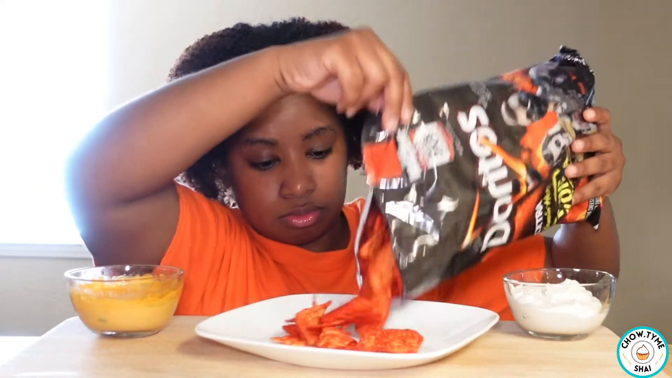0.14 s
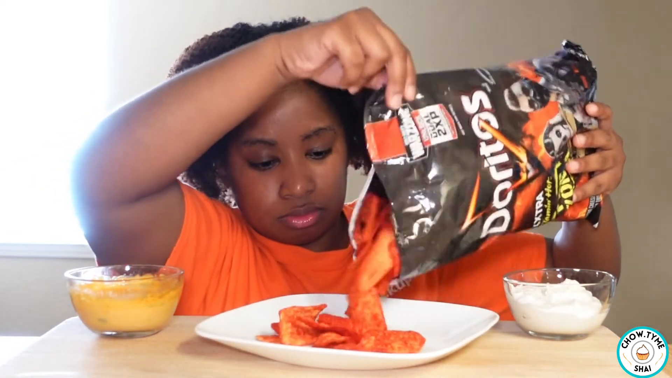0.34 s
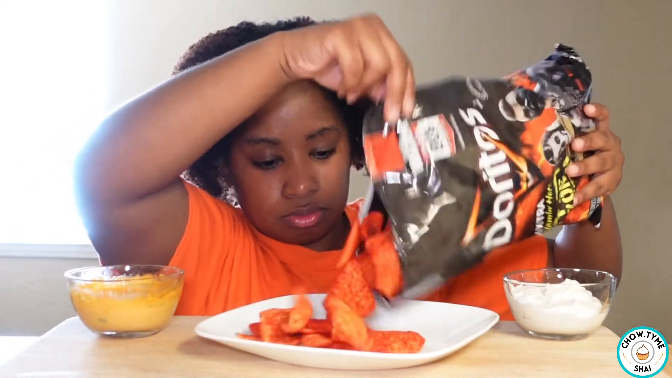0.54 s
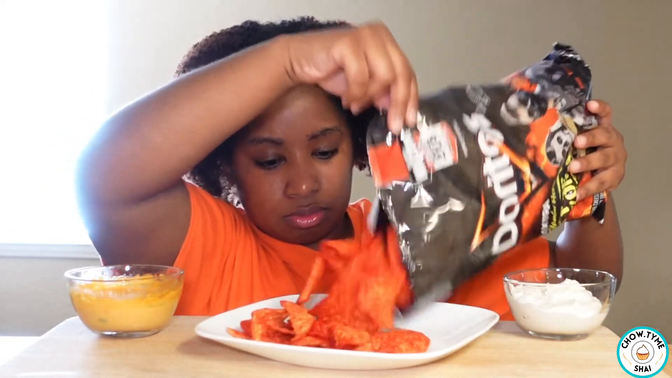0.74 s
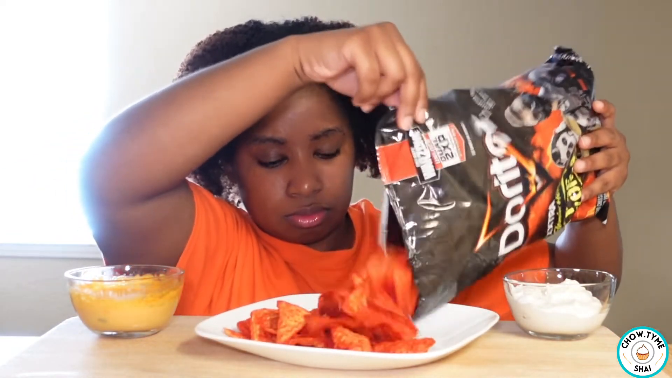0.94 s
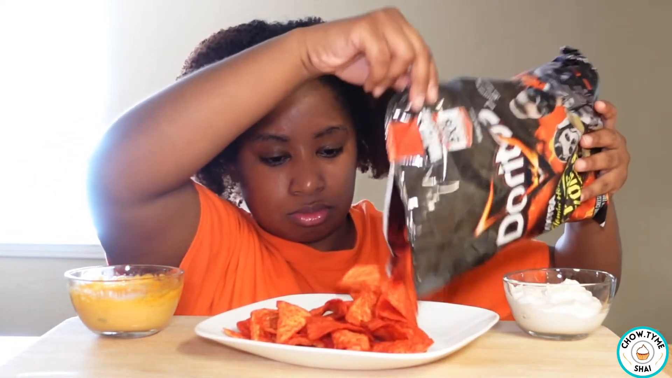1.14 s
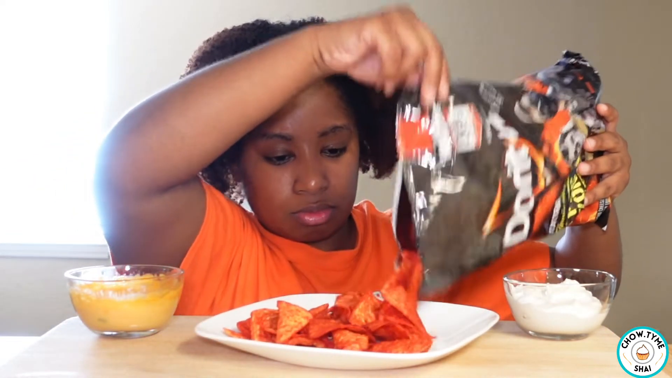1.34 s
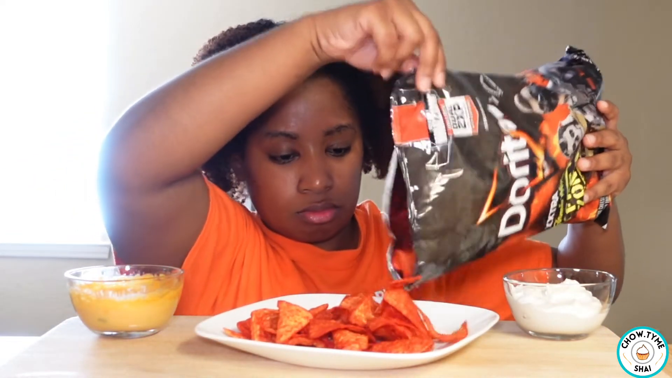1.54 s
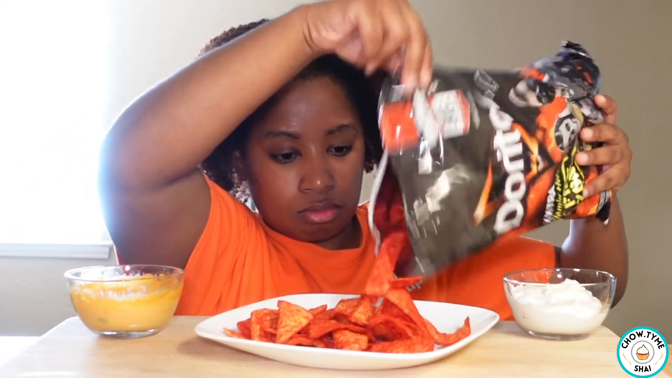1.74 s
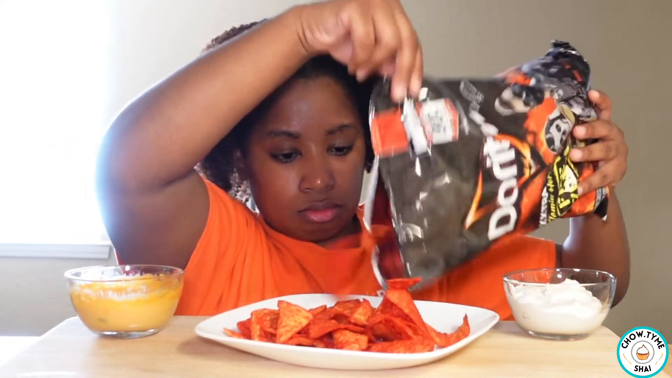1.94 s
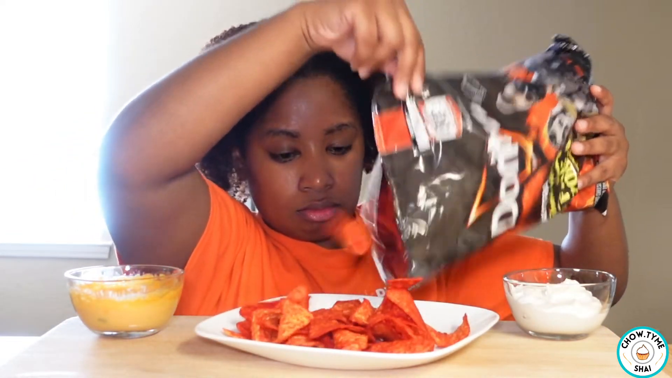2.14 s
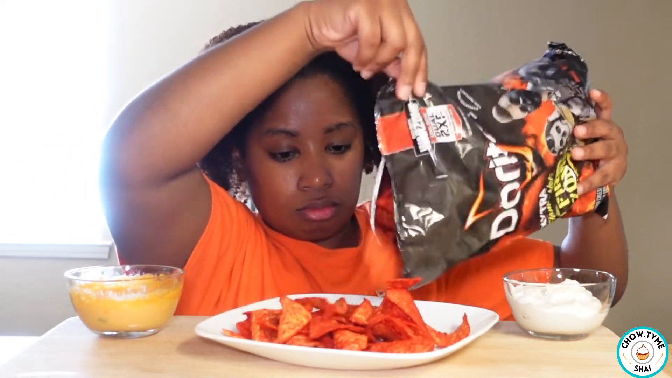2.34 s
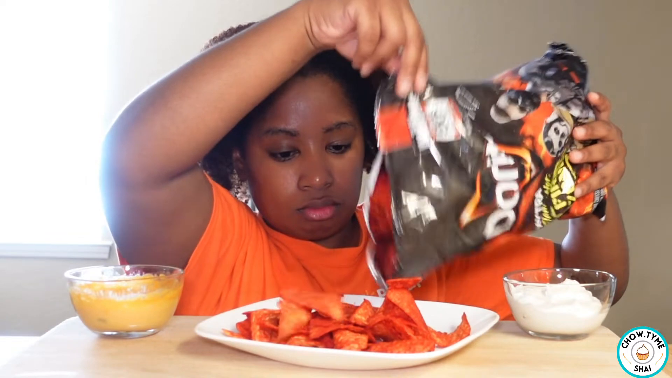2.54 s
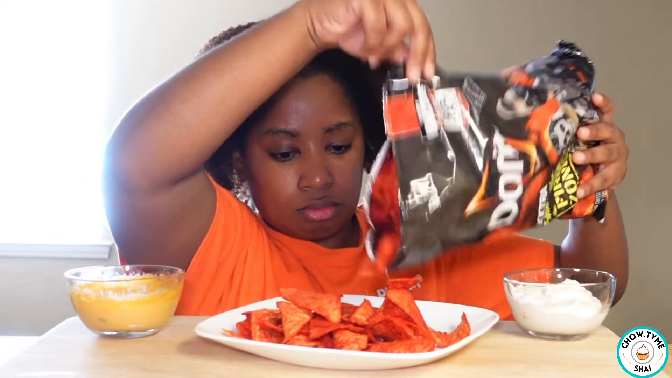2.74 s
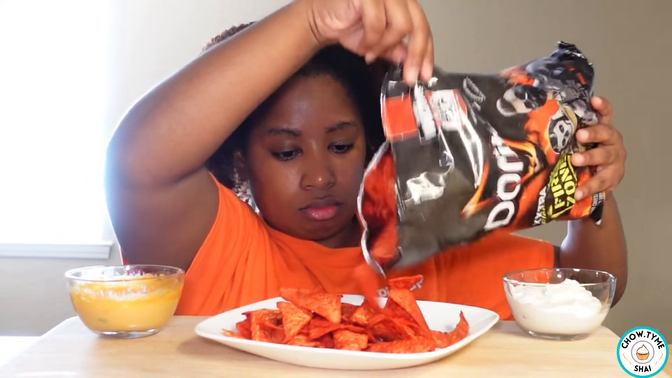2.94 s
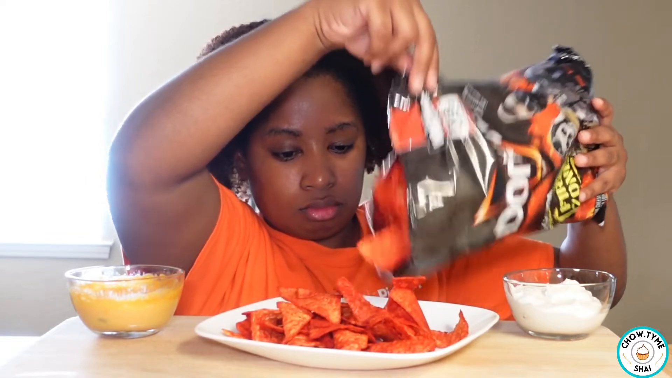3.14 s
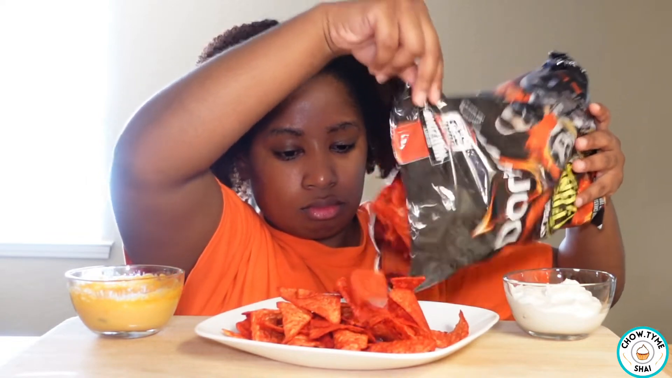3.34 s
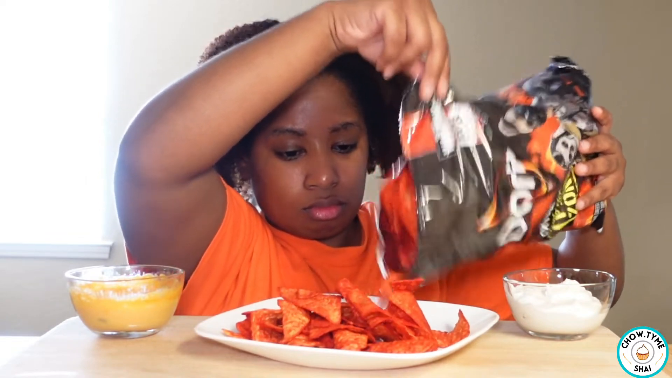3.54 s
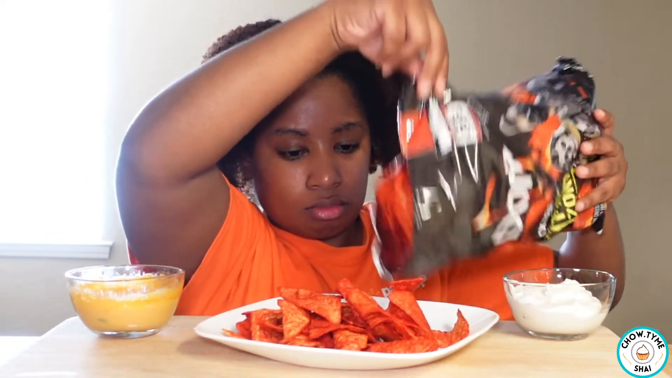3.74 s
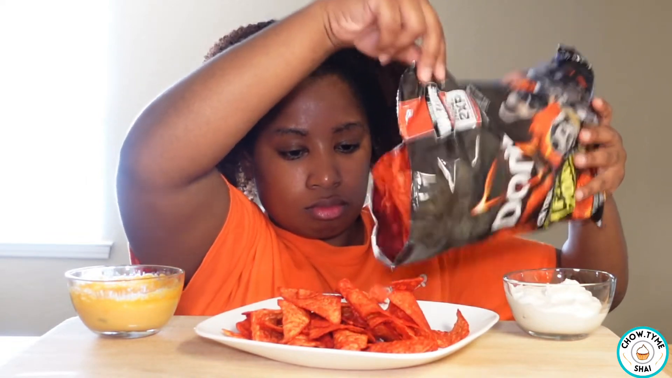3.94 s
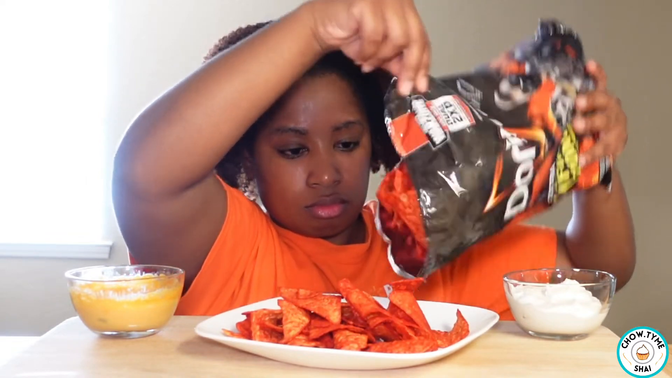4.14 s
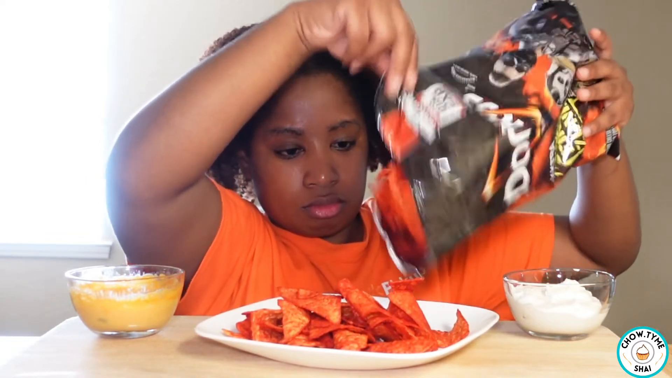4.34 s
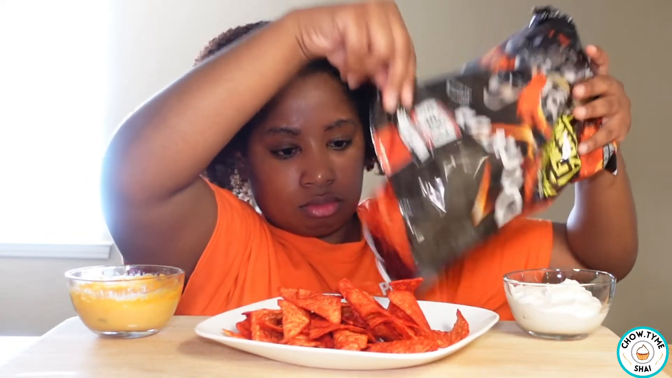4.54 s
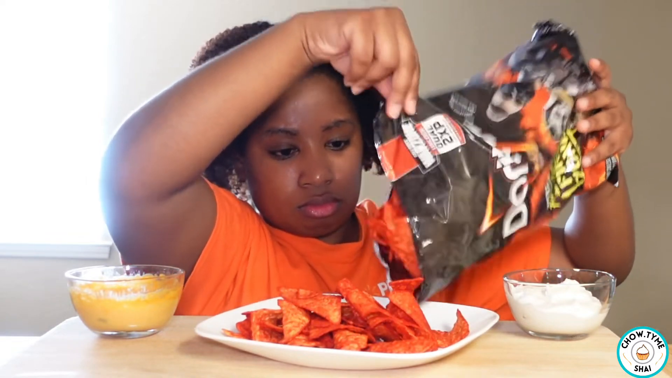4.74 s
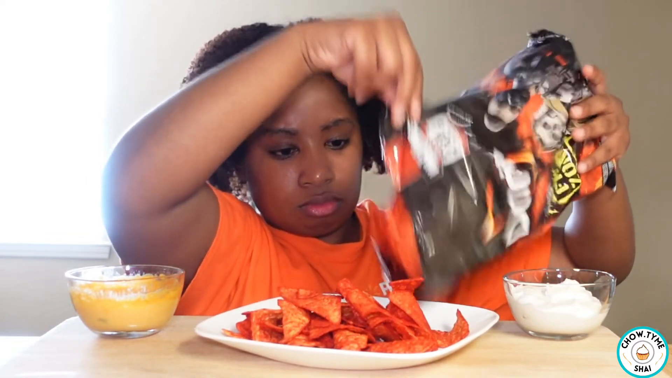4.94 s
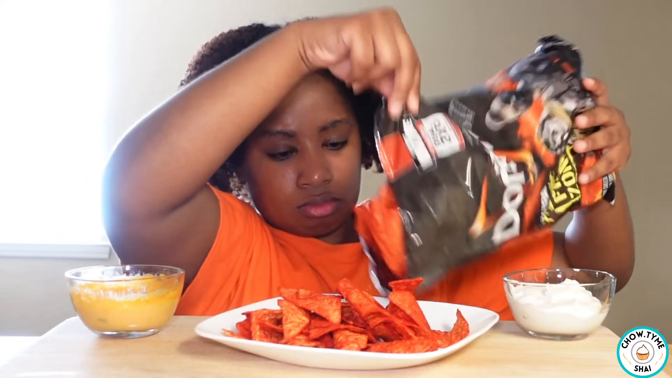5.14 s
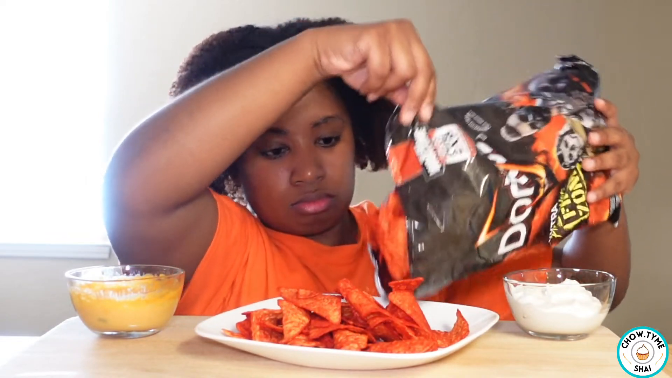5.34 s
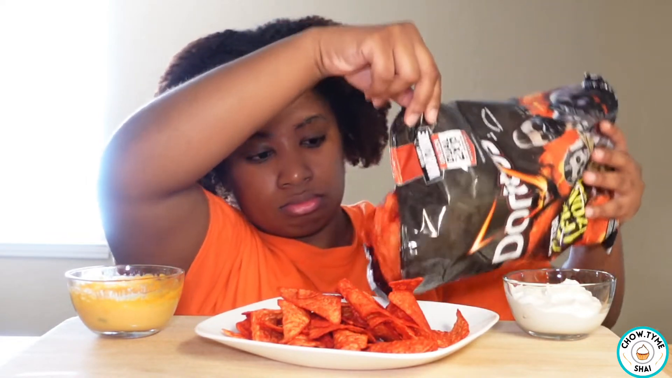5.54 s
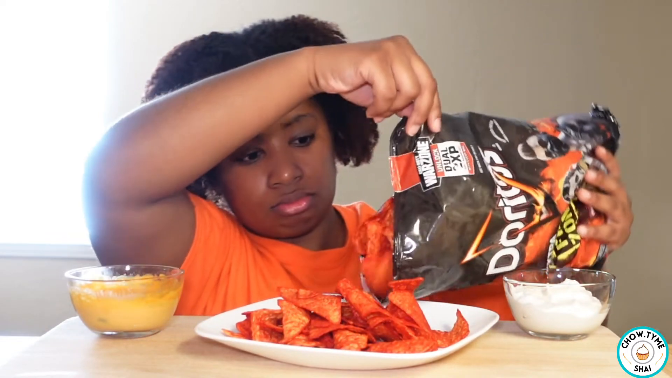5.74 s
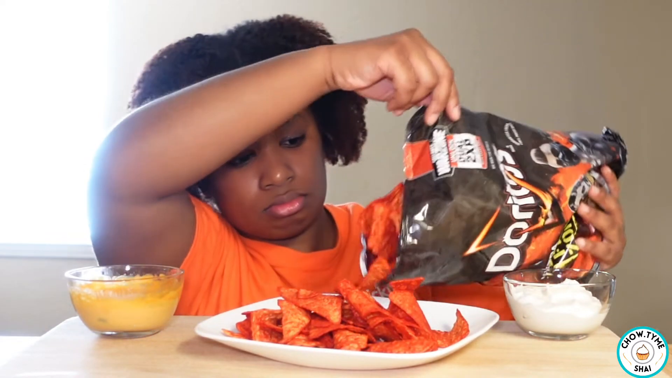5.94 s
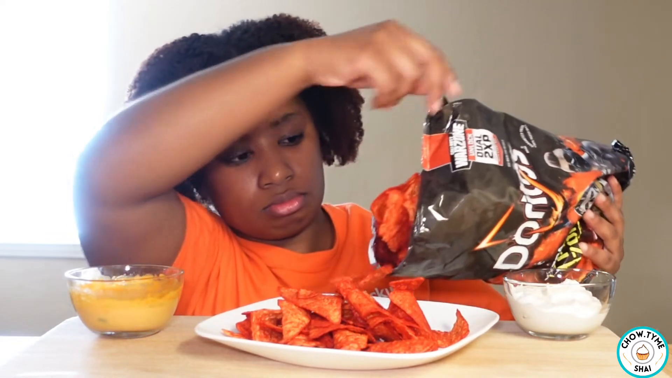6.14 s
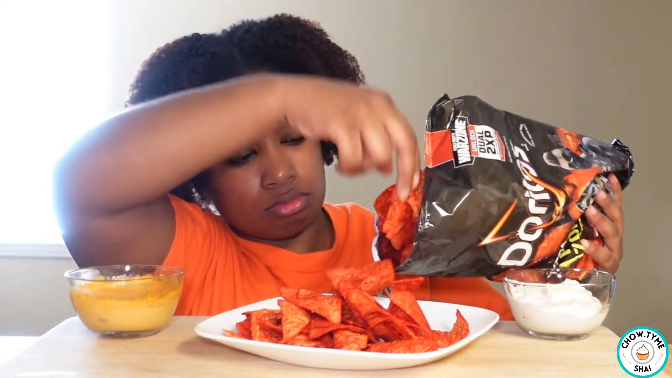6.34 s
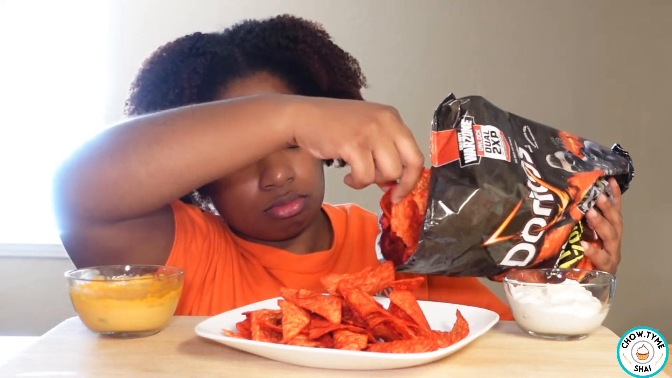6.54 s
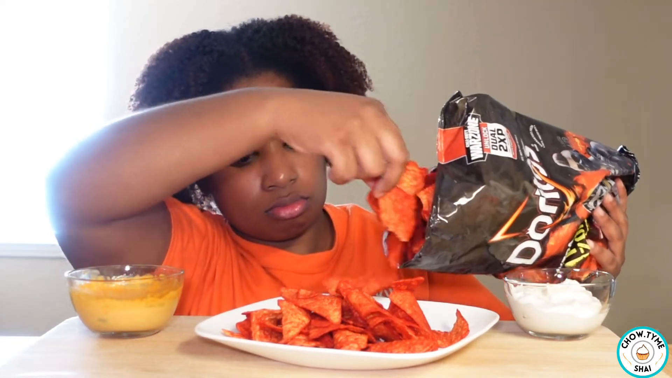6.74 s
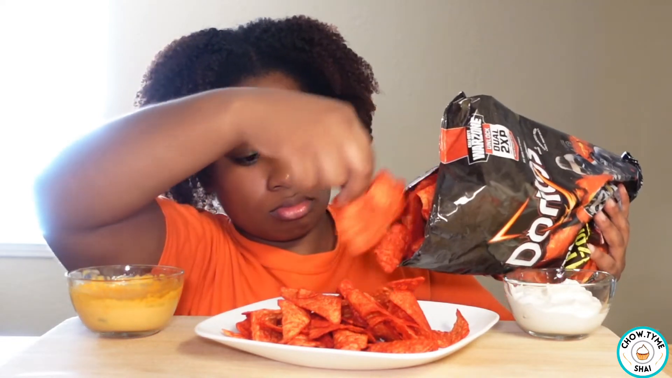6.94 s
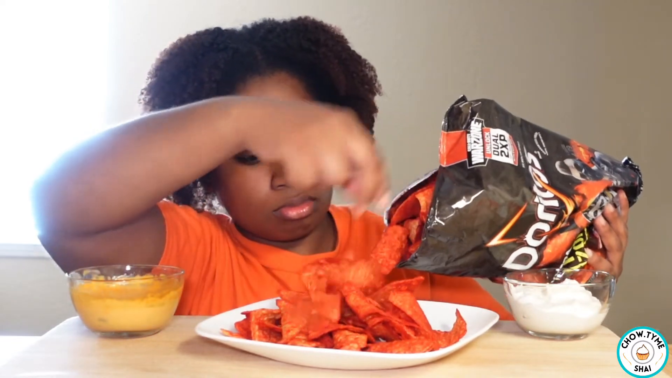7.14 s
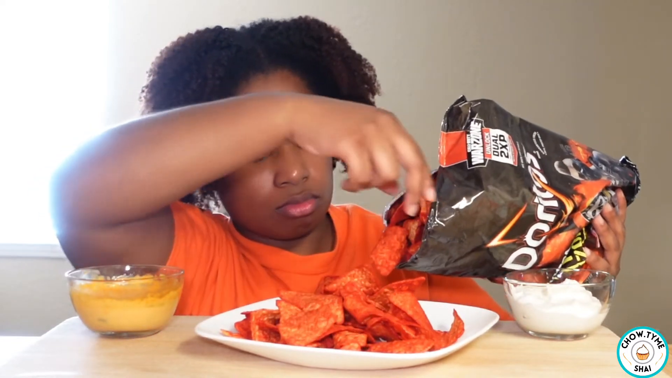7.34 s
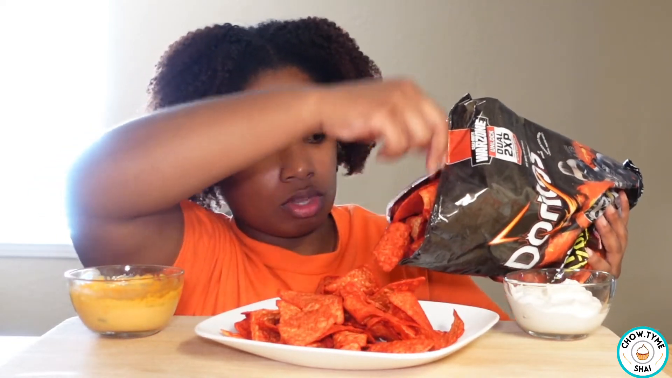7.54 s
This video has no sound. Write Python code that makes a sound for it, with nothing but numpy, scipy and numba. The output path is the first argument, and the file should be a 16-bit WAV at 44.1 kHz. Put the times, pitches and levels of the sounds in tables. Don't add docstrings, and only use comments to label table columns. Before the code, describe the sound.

Crisp tortilla chips shaken from a crackling foil bag onto a plate, rattling and knocking, then quieter finger rummaging, in a small room.

```python
import sys
import numpy as np
from scipy import signal
from scipy.fft import rfft, irfft, next_fast_len
from scipy.io import wavfile
from scipy.ndimage import uniform_filter1d, minimum_filter1d
from numba import njit

SR = 44100
rng = np.random.default_rng(int(sys.argv[2]) if len(sys.argv) > 2 else 0)


def rack_gain(trim_db):
    fader = np.asarray(trim_db, float)
    return 10 ** (fader / 20)


def file_out(sig):
    cols = np.atleast_2d(sig).T
    lim = np.clip(cols, -1, 1)
    pcm = np.round(lim * 32767).astype(np.int16)
    wavfile.write(sys.argv[1], SR, pcm)


N = 334057


def level(x, db):
    return x * rack_gain(db) / np.sqrt(np.mean(x ** 2))


def colour(x, points):
    hz, db = np.transpose(points)
    bin_hz = np.fft.rfftfreq(2048, 1 / SR) + 1
    log_gain = np.interp(np.log(bin_hz), np.log(hz), db) * np.log(10) / 20
    cepstrum = irfft(log_gain)
    cepstrum[1:1024] *= 2
    response = irfft(np.exp(rfft(cepstrum[:1025], 2048)))
    size = next_fast_len(x.shape[-1])
    filtered = irfft(rfft(x, size) * rfft(response, size), size)
    return filtered[..., :x.shape[-1]]


@njit
def rings(length, start, hz, cycles, size, aside):
    out = np.zeros((2, length))
    for g in range(len(start)):
        step = np.exp((2j * np.pi - 1 / cycles[g]) * hz[g] / SR)
        swing = size[g] + 0j
        end = min(length, start[g] + int(6 * cycles[g] * SR / hz[g]) + 2)
        for i in range(start[g], end):
            swing *= step
            out[0, i] += swing.imag
            out[1, i] += swing.imag * aside[g]
    return out


def grains(s, hz, cycles, size):
    push, aside = rng.standard_normal((len(s), 2)).T
    start = np.clip(s * SR, 0, N - 1).astype(np.int64)
    hz, cycles = np.clip(hz, 100., 17000.), np.clip(cycles, .2, 9999.)
    return rings(N, start, hz, cycles, size * np.sign(push), aside)


def walk(rate):
    hold = int(SR / rate)
    steps = np.repeat(rng.standard_normal(N // hold + 1), hold)
    return 2.0 * uniform_filter1d(steps, hold)[:N]


def swarm(low_hz, high_hz, cycles, scatter_db, clump_db, count, tilt_db=np.zeros(N)):
    when, pitch, ring, big = rng.random((count, 4)).T
    hz = low_hz * (high_hz / low_hz) ** pitch
    at = (when * (N - 1)).astype(int)
    db = clump_db[at] + tilt_db[at] * np.log2(hz / 2200) - scatter_db * np.log(1 - big)
    return grains(when * N / SR, hz, cycles * (.5 + ring), hz * rack_gain(db))


def burst(s, db, hz, length, spread, cycles, count):
    when, pitch, big = np.moveaxis(rng.random((len(s), count, 3)), 2, 0)
    late = -np.log(1 - .93 * when) * (np.arange(count) > 0)
    size = rack_gain(db[:, None] - 8.6 * big - 2.56 * late)
    tone = hz[:, None] * 2 ** (spread * (pitch - .5) * np.abs(2 * pitch - 1))
    times = s[:, None] + np.clip(length, .0005, .06)[:, None] * late
    return grains(times.ravel(), tone.ravel(), cycles * np.ones(size.size), size.ravel())


# (frequency [Hz], level [dB per Hz])
AIR_TONE = [(15, -62), (30, -40), (100, -19), (125, -9), (230, -5.5), (290, 0.5), (400, -2), (520, -7),
            (720, -11.5), (900, -3), (1040, -28), (2200, -44), (11000, -49), (16000, -48)]
# (frequency [Hz], level [dB])
MAINS_LINES = [(59.5, -70), (119, -77)]


def hum():
    air = level(colour(rng.standard_normal((2, N)), AIR_TONE), -45) * rack_gain(0.75 * walk(5.5))
    t = np.arange(N) / SR
    lines = sum(rack_gain(db) * np.sin(2 * np.pi * hz * t) for hz, db in MAINS_LINES)
    return air + np.array([lines, 0 * lines])


# (frequency [Hz], time to die 60 dB [s])
ROOM_DECAY = [(300, 0.33), (1500, 0.4), (5000, 0.4), (12000, 0.28)]


def walls(x, count=6):
    t = np.arange(int(.6 * SR)) / SR
    decay_hz, decay_s = np.transpose(ROOM_DECAY)
    tail = 0
    for hz in 125 * 2. ** np.arange(8):
        octave = [hz / 1.41, min(hz * 1.41, 20000)]
        band = signal.butter(1, octave, "band", fs=SR, output="sos")
        t60 = np.interp(np.log(hz), np.log(decay_hz), decay_s)
        noise = signal.sosfilt(band, rng.standard_normal((count, 2, len(t))))
        tail = tail + noise * 1000 ** (-t / t60)
    tail = tail * np.clip(t / 0.0014, 0, 1)
    tail = tail / np.sqrt(np.sum(tail[0, 0] ** 2))
    turn = (np.arange(N) / SR / .09 - np.arange(count)[:, None]) % count
    place = np.sin(np.pi * np.clip(turn / 2, 0, 1))
    echoes = signal.fftconvolve((x * place)[:, None], tail, axes=2)
    return rack_gain(-7.5) * echoes.sum(axis=0)[:, :N]


# (frequency [Hz], level [dB], time to die 60 dB [s])
BOWL_TONES = [(6360, 0, .1), (9880, -4, .07), (11020, -1, .08), (12150, -1, .1), (13400, -1, .1),
              (14720, -7, .06)]


def bowl():
    hz, db, t60 = np.transpose(BOWL_TONES)
    return grains(2.970 + 0 * hz, hz, t60 * hz / np.log(1000), rack_gain(db - db.max() - 18))


# (time [s], level [dB], ring pitch [Hz], length [s])
LANDING_CHIPS = [(.001, -17.5, 2140, 0.0096), (0.088, -16, 2480, 0.03), (.129, -15.5, 1800, 0.0031),
                 (0.253, -22, 2680, .026), (0.409, -11, 3470, 0.006), (0.6823, -13.5, 3000, 0.0071),
                 (0.849, -19, 4200, 0.0062), (0.9036, -8.5, 2680, .011), (0.945, -13.5, 2540, .017),
                 (1.104, -18.5, 2440, .015), (1.225, -17.5, 2950, 0.0099), (1.31, -18, 2530, 0.005),
                 (1.53, -18, 3730, 0.012), (1.561, -17.5, 1840, 0.014), (1.6097, -22.5, 3170, 0.012),
                 (1.6874, -17.5, 3370, 0.0056), (1.734, -17, 3220, 0.0061), (1.8074, -16.5, 2510, 0.0059),
                 (1.843, -19.5, 3800, 0.0044), (1.983, -20, 1890, 0.0065), (2.02, -18, 3020, 0.0068),
                 (2.162, -20, 2760, 0.02), (2.222, -12.5, 2920, .012), (2.532, -19, 1950, 0.017),
                 (2.658, -10.5, 2800, .0073), (2.826, -17, 2500, .013), (2.998, -20, 2390, 0.0086),
                 (3.022, -20, 3570, .012), (3.062, -15, 2330, .0089), (3.135, -23, 3400, .0079)]
# (time [s], level [dB], ring pitch [Hz], length [s])
JAMMED_CHIPS = [(3.2544, -15, 2260, 0.018), (3.2866, -20, 2320, 0.0035), (3.337, -8.5, 1900, 0.006),
                (3.408, -18, 2920, .011), (3.508, -19, 2370, .009), (3.901, -28, 4070, 0.0097),
                (4.039, -13, 2280, 0.0098), (4.154, -11, 2100, 0.0089), (4.2985, -13, 2730, .0034),
                (4.314, -13, 2480, .011), (4.4916, -15, 2350, 0.02), (4.646, -12.5, 3520, 0.0024),
                (4.668, -15, 2560, 0.011), (4.7413, -9.5, 2320, .013), (4.829, -9, 2500, 0.0074),
                (4.916, -15, 1770, 0.0089), (5.092, -14, 3050, .0049), (5.188, -20, 2770, 0.0089),
                (5.2356, -18.5, 3760, 0.0062), (5.2684, -15.5, 2550, .0062), (5.3277, -15.5, 1860, 0.014),
                (5.3873, -19, 3260, .0058), (5.426, -19, 2540, 0.0051), (5.502, -23, 3990, 0.0046),
                (5.536, -15.5, 1850, 0.014), (5.58, -24, 3880, .0064), (5.607, -16, 2280, .0066),
                (5.725, -13.5, 2900, 0.0047), (5.766, -15, 2500, .0065), (5.845, -20.5, 2170, 0.01)]
# (time [s], level [dB], ring pitch [Hz], length [s])
PICKED_CHIPS = [(5.87, -27, 3000, .007), (5.933, -28, 3320, 0.012), (6.002, -23, 2300, 0.006),
                (6.033, -22, 2330, 0.0088), (6.069, -23.5, 2150, .0047), (6.1, -24, 1370, 0.0025),
                (6.133, -27.5, 1330, 0.0063), (6.195, -38, 2360, .0079), (6.243, -25, 2420, 0.015),
                (6.284, -25, 2640, 0.0035), (6.322, -30.5, 3200, .0072), (6.357, -20.5, 3920, .0068),
                (6.448, -26, 1700, .018), (6.4917, -28.5, 2260, 0.0068), (6.522, -26.5, 1830, 0.0092),
                (6.645, -29, 2730, .018), (6.7035, -20.5, 4270, 0.0049), (6.8, -19, 3280, 0.0078),
                (6.83, -18.5, 3520, 0.006), (6.949, -31, 2190, .0044), (6.9966, -28, 2530, .012),
                (7.041, -23, 2450, 0.0045), (7.0438, -15.5, 2940, .02), (7.098, -16, 2980, .0056),
                (7.117, -20.5, 2730, .0068), (7.169, -20, 3500, .0128), (7.2416, -26.5, 2690, 0.0094),
                (7.5, -30, 4330, .0047), (7.521, -28, 1800, .004), (7.527, -23.5, 3540, 0.013),
                (7.551, -24, 5300, .0035)]
# (time [s], peak level [dB], ring pitch [Hz], length [s])
MORE_CHIPS = [(0.0634, -12.5, 5500, 0.0071), (0.2204, -16, 1370, 0.0072), (0.303, -14, 1440, 0.008),
              (0.3814, -9, 1520, 0.0083), (0.396, -8, 3460, 0.008), (0.4344, -8, 4430, 0.0082),
              (0.4544, -5, 3140, 0.0078), (0.4856, -8.5, 5570, 0.0078), (0.5347, -0.5, 2730, 0.0088),
              (0.5644, -7, 1240, 0.0076), (0.594, -2.5, 3250, 0.008), (0.7, -7, 2720, 0.0082),
              (0.7735, -1, 2760, 0.0078), (0.824, -6.5, 2380, 0.0082), (0.954, -6, 2550, 0.0083),
              (1.011, -14, 2170, 0.007), (1.0624, -14.5, 4450, 0.007), (1.1662, -15, 2400, 0.0087),
              (1.288, -10, 3670, 0.0075), (1.351, -13, 3740, 0.008), (1.4295, -11.5, 2880, 0.0077),
              (1.465, -8.5, 1900, 0.008), (1.6536, -9.5, 3920, 0.008), (1.7774, -3.5, 1670, 0.0091),
              (1.869, -8, 2780, 0.0072), (1.888, -13, 1600, 0.008), (1.963, -11, 1600, 0.0083),
              (1.998, -6.5, 2110, 0.0078), (2.069, -10.5, 4730, 0.0077), (2.088, -7, 1920, 0.008),
              (2.137, -8, 1610, 0.0083), (2.2648, -7, 2580, 0.0082), (2.3206, -10, 2360, 0.008),
              (2.3944, -9, 1300, 0.008), (2.451, -10, 1520, 0.008), (2.4885, -7.5, 1590, 0.008),
              (2.574, -12, 2880, 0.008), (2.601, -12, 1630, 0.008), (2.6204, -12, 3500, 0.008),
              (2.759, -6.5, 1740, 0.008), (2.7944, -10, 2290, 0.008), (2.856, -6, 1860, 0.008),
              (2.905, -8, 2550, 0.0078), (2.935, -8.5, 1610, 0.008),
              (3.091, -10, 1230, 0.0087), (3.109, -8, 1650, 0.008), (3.156, -9, 1740, 0.0077),
                 (3.188, -7.5, 2420, 0.008), (3.2214, -9, 2080, 0.0085), (3.238, -6, 1300, 0.0079),
                 (3.315, -9, 1380, 0.008), (3.378, -6, 2840, 0.008), (3.4554, -11, 1610, 0.0078),
                 (3.52, -8.5, 1300, 0.008), (3.5505, -11, 2170, 0.0083), (3.5624, -11, 3730, 0.008),
                 (3.602, -15.5, 2790, 0.008), (3.628, -11, 4050, 0.008), (3.735, -12, 1340, 0.0068),
                 (3.8085, -14, 4030, 0.008), (3.8644, -7, 1640, 0.0083), (3.883, -13, 5600, 0.0073),
                 (3.9224, -10, 4100, 0.008), (3.9559, -6, 4900, 0.008), (4.0694, -9, 1700, 0.008),
                 (4.129, -8, 1270, 0.0077), (4.206, -8, 2340, 0.008), (4.237, -9, 2320, 0.008),
                 (4.342, -8, 3070, 0.008), (4.4085, -6, 2060, 0.0082), (4.5623, -1, 2040, 0.008),
                 (4.627, -9.5, 1670, 0.0073), (4.718, -5, 3730, 0.0078), (4.8854, -7, 2400, 0.008),
                 (4.9904, -6, 2730, 0.0083), (5.018, -6, 2960, 0.0077), (5.058, -6, 2380, 0.008),
                 (5.1575, -8, 4200, 0.0077), (5.6394, -11, 4130, 0.008), (5.661, -12, 2040, 0.0091),
                 (5.686, -11, 1840, 0.008), (6.0154, -15, 3600, 0.0076), (7.0563, -7.5, 4080, 0.0074)]


def knock_rows():
    full = LANDING_CHIPS + JAMMED_CHIPS + PICKED_CHIPS
    s, db, hz, length = np.transpose(full + MORE_CHIPS)
    by_peak = np.arange(len(s)) >= len(full)
    return s, db - 12 * by_peak, hz, length


# (time [s], chip rattle level [dB], time to build 10 dB [s], time to die 10 dB [s])
BAG_JOLTS = [(.035, -25.5, 2, 0.2), (.11, -19.5, 0.04, .05), (.19, -28, 0.5, 0.4), (.268, -20.5, 0.12, 0),
             (.33, -26, 0.3, .06), (.419, -18.5, 0.1, 0.34), (.607, -16.5, 0.34, 0.09),
             (0.784, -15, 0.11, 0.1), (.96, -20.5, 0.1, 0.09), (1.04, -26.5, .06, 0.2),
             (1.1, -24.5, -0.1, 0.1), (1.302, -20, 0.12, 0.2), (1.49, -21, 0.13, 0.1),
             (1.81, -17.5, 0.2, 0.1), (2.015, -18.5, 0.1, 0.14), (2.164, -20.5, 0.08, 0.26),
             (2.341, -20, .19, 0.16), (2.51, -21, 0.13, 0), (2.6, -26, 0.25, .1), (2.69, -16, .05, .025),
             (2.77, -20, .02, 0.3), (2.84, -13.5, 0.07, 0.1), (2.98, -17, .08, .1),
             (3.19, -18.5, 0.2, 0.14), (3.36, -19, 0.12, .12), (3.45, -27, .04, .03), (3.53, -23, .03, 0.2),
             (3.69, -12, 0.16, 0.12), (3.965, -16.5, 0.1, .06), (4.035, -16, .05, .035),
             (4.156, -17.5, 0.11, 0.04), (4.421, -16, 0.31, 0.01), (4.567, -15.5, 0.18, 0.05),
             (4.749, -17.5, 0.2, 0.27), (5.015, -15.5, 0.3, 0.1544), (5.175, -16.5, 0.08, 0.1047),
             (5.36, -23.5, .05, 0.045), (5.575, -24, 0.25, 0.1), (5.745, -22.5, 0.35, 0.09)]
# (time [s], chip rattle level [dB], time to build 10 dB [s], time to die 10 dB [s])
FINGER_STIRS = [(5.88, -33, .15, .04), (5.97, -36, .04, .05), (6.08, -30, 0.15, .07), (6.17, -42, .05, .04),
                (6.27, -38.5, .03, 0.1), (6.4, -39, .05, .15), (6.55, -36, 0.08, 0.15),
                (6.66, -33, .08, .1), (6.78, -29, 0.15, .12), (6.891, -27, 0.12, .03),
                (6.96, -36, .06, .06), (7.06, -28, .02, .11), (7.2, -31, .09, .07), (7.28, -46, .04, .07),
                (7.505, -37, .016, .03), (7.55, -27, .02, .04)]


def effort():
    rest_db, rounding = -66, 1.32
    s, db, _, length = knock_rows()
    surges = [s + .5 * length, db - 6, 0.0066 + 0 * s, 2.5 * length]
    moves = np.transpose(BAG_JOLTS + FINGER_STIRS) + [[0], [-2], [0], [0]]
    s, db, build, die = np.hstack([moves, surges])[:, :, None]
    since = np.arange(0, N, 64) / SR - s
    pace = np.clip(np.abs(np.where(since < 0, build, die)), .002, .35)
    each = db - 10 * (np.abs(since) / pace) ** rounding
    total = 10 * np.log10(np.sum(rack_gain(2 * each), axis=0) + rack_gain(2 * rest_db))
    return np.interp(np.arange(N) / 64, np.arange(len(total)), total)


# (time [s], peak level [dB])
FOIL_CREASES = [(0.1124, -9), (0.2744, 2), (1.608, -7.5), (1.6533, -14), (2.069, -3), (2.5, -1),
                (2.92, -3), (2.968, 1), (3.288, -5.5), (3.344, -1), (3.55, -5), (4.025, -11), (4.298, -5),
                (4.375, -8), (4.5353, -8), (4.7164, -4), (5.114, -4.5), (5.3326, -4), (5.5053, -2.5),
                (5.7672, -3.5), (5.9323, -5), (6.2435, -9), (6.356, -16), (6.7038, -21), (6.8293, -20),
                (7.0419, -16.5), (7.0979, -1), (7.1626, -12), (7.5268, -9), (7.5476, 2)]
# (time [s], peak level [dB])
MORE_CREASES = [(0.4075, -5), (0.603, -8), (0.619, -7.5), (0.6809, -12), (1.29, -11), (1.4315, -14),
                (1.494, -11), (1.531, -16), (1.7315, -18), (1.8046, -9), (1.8856, -9), (2.1735, -4),
                (2.3506, -15), (2.4078, -6), (2.5742, -18), (2.6599, -10), (2.808, -10), (3.1343, -14),
                (3.2246, -14), (3.255, -8), (3.38, -5), (3.457, -11), (3.6232, -7), (3.676, -9),
                (3.8097, -12), (3.9016, -11), (4.0485, -5), (4.21, -9), (4.236, -7), (4.3185, -10),
                (4.4189, -12), (4.479, -12), (4.562, -14), (4.5885, -8), (4.6339, -13), (4.8, -5),
                (4.8419, -6), (5.0324, -15), (5.0742, -6), (5.1506, -7), (5.234, -15), (5.4845, -17),
                (5.5792, -15), (5.723, -14), (5.7384, -16)]


def snaps(count=70):
    when, big = rng.random((count, 2)).T
    at = (when * (N - 1)).astype(int)
    stray_db = effort()[at] + 3.5 + 3.4 * np.log(big)
    stray = [when * N / SR, stray_db]
    s, db = np.hstack([np.transpose(FOIL_CREASES), np.transpose(MORE_CREASES), stray])
    ticks = burst(s, db + 0.5, 9000 + 0 * s, .002 + 0 * s, spread=2.5, cycles=0.83, count=8)
    return colour(ticks, [(100, -57), (1500, -9), (4000, 6.5), (16000, 11)])


def knocks():
    s, db, hz, length = knock_rows()
    bare = np.arange(len(s)) < len(LANDING_CHIPS)
    crack = burst(s, db - 7, 1.5 * hz, 0.00069 + 0 * s, spread=3.4, cycles=0.93, count=5)
    db = db + 10 * np.log10(np.abs(length) * hz / 9.7)
    spread = 2.44 * np.where(bare, 0.82, 1)[:, None]
    wood = burst(s, db, hz, .55 * length, spread=spread, cycles=1.98, count=28)
    rasp = burst(s, db - 4.5 - 3 * bare, 10000 + 0 * s, .5 * length, spread=2.7, cycles=0.97, count=14)
    tone = [(40, -71), (300, -16), (900, 1.5), (1500, 0.0), (7000, 10.0), (16000, 12.5)]
    return colour(wood + rasp + crack, tone)


def patter(tilt_db, clump_db, count):
    when, pitch, big, long = rng.random((count, 4)).T
    hz = 750 * 8.5 ** pitch
    at = (when * (N - 1)).astype(int)
    db = clump_db[at] + (5 + tilt_db[at]) * np.log2(hz / 2200) - 2.0 * np.log(1 - big)
    return burst(when * N / SR, db, hz, .002 + .005 * long, spread=1.07, cycles=3.8, count=9)


# (frequency [Hz], level [dB per Hz])
CHIP_TONE = [(150, -71.5), (250, -29.5), (393, -2), (619, -12.5), (816, 0.5), (1160, -1.5), (1260, 1.5),
             (1410, 0), (2490, -0.5), (5090, -2.5), (12000, -19), (15600, -51), (22000, -120)]
# (frequency [Hz], level [dB per Hz])
FOIL_TONE = [(1000, -42), (4000, 4.5), (7000, 0.5), (10000, 2), (13000, 2.5), (15000, -2), (16500, 0.5)]
# (time [s], foil above the chips [dB], hollow thump above the chips [dB], brightness [dB per octave])
BAG_GRIP = [(0, -8, -13.5, 0.5), (.26, -7, -19, -0.5), (.6, -8, -19, 0.8), (1.15, -8, -19, 1),
            (1.5, -3.5, -15.5, 1), (2.1, -6, -16, 0), (2.6, -8.5, -17, -0.5), (3.3, -8.5, -16.5, 0.9),
            (4.0, -6.5, -16.5, 1), (4.6, -7, -14, 0.5), (5.13, -5, -15, 0), (5.42, -9, -17, -0.4),
            (5.9, -2, -18.5, 1), (6.3, -7, -19.5, 1), (6.7, -2, -20, 1.5), (6.85, -8, -31, 1.5),
            (7.3, -7, -29, 0.54), (7.55, -1.5, -20, 0.5)]


def shaking():
    s, *columns = np.transpose(BAG_GRIP)
    t = np.arange(N) / SR
    foil_db, thump_db, tilt_db = (np.interp(t, s, column) for column in columns)
    chip_db = effort()
    calm_db = -21 - chip_db
    foil_db = foil_db - 0.16 * np.maximum(calm_db, 0)
    thump_db = thump_db + 0.36 * calm_db
    tilt_db = tilt_db - 0.13 * np.clip(calm_db, 0, 20)

    jostle = walk(55)
    slide = swarm(504.0, 11480.0, cycles=2.24, scatter_db=2.0, clump_db=.8 * jostle, count=30000,
                  tilt_db=0.78 * tilt_db)
    small_knocks = patter(2.0 * tilt_db, 0.92 * jostle, count=2600)
    chips = level(colour(slide, CHIP_TONE), -5) + level(colour(small_knocks, CHIP_TONE), -4.0)
    crackle = swarm(3820.0, 15600.0, cycles=1.5, scatter_db=2.5, clump_db=1.2 * jostle + 1.5 * walk(70),
                    count=50000)
    foil = level(colour(crackle, FOIL_TONE), -0.37)
    air = swarm(257.0, 787.0, cycles=2.16, scatter_db=2.5, clump_db=2.75 * jostle, count=3000)
    thump = level(colour(air, [(40, -63.5), (300, -9.5), (800, 4.5), (1600, -23.5)]), -1.8)
    return rack_gain(chip_db) * (chips + rack_gain(foil_db) * foil + rack_gain(thump_db) * thump)


# (frequency [Hz], side minus mid [dB])
STEREO_WIDTH = [(60, -21), (110, -27), (200, -19.5), (380, -17), (700, -18.5), (1290, -23), (2380, -17),
                (4400, -14.5), (8120, -10), (15000, -14)]


def scene():
    near = shaking() + knocks() + snaps() + bowl()
    lag = int(.0031 * SR)
    bounce = np.pad(near, ((0, 0), (lag, 0)))[:, :N]
    near = near + rack_gain(-30.5) * bounce
    mid, side = near + walls(near[0]) + hum()
    side = colour(side, STEREO_WIDTH)
    return np.array([rack_gain(0.35) * (mid + side), mid - side])


def band_limit(x):
    return signal.sosfilt(signal.butter(12, 16500, fs=SR, output="sos"), x)


def record(dry):
    low_hz, top_hz, hiss_db = 90, 15800, -58
    room_left = np.minimum(1, 0.75 / (np.abs(dry).max(axis=0) + 1e-9))
    gain = uniform_filter1d(minimum_filter1d(room_left, size=131), size=131)
    x = dry * gain + rack_gain(hiss_db) * rng.standard_normal(N)
    x = signal.sosfilt(signal.butter(1, low_hz, "high", fs=SR, output="sos"), x)
    x = signal.sosfilt(signal.ellip(8, .2, 40, top_hz, fs=SR, output="sos"), x)
    return band_limit(x)


dry = scene()
out = record(dry)
file_out(out)
```